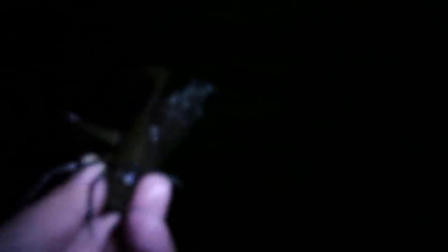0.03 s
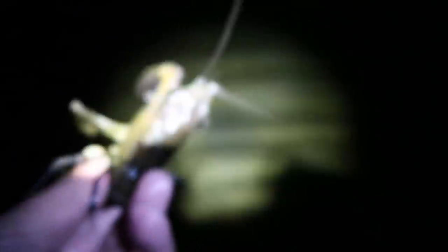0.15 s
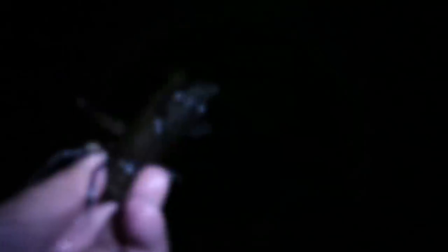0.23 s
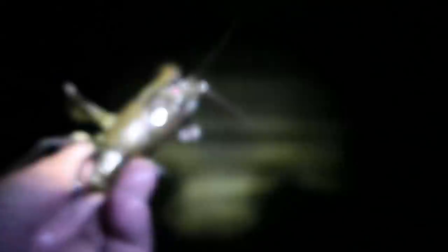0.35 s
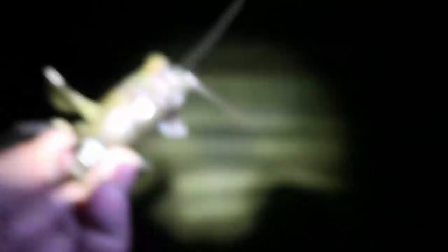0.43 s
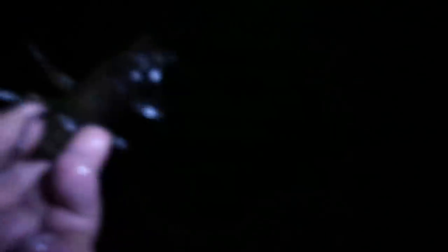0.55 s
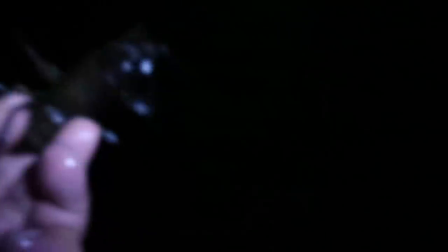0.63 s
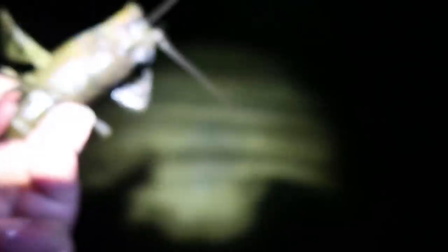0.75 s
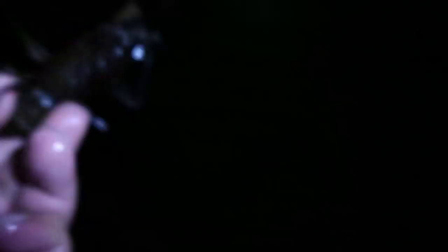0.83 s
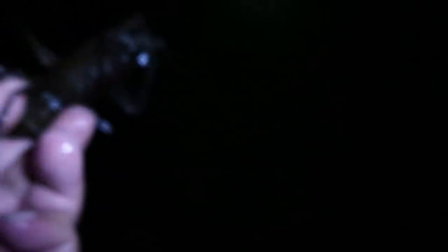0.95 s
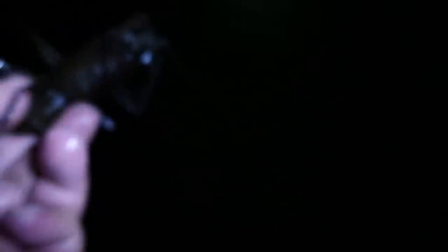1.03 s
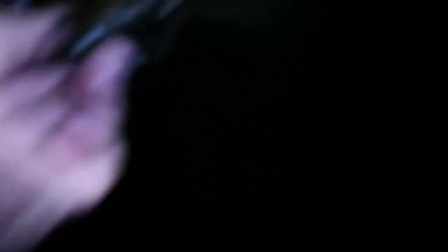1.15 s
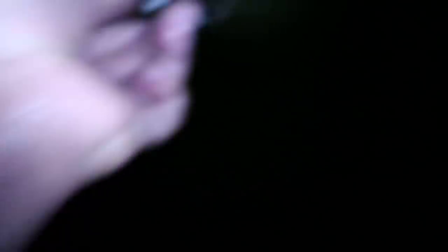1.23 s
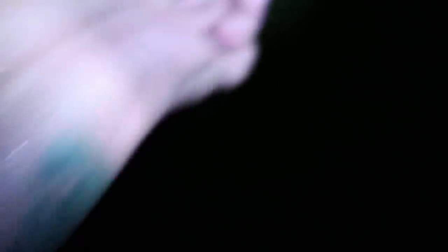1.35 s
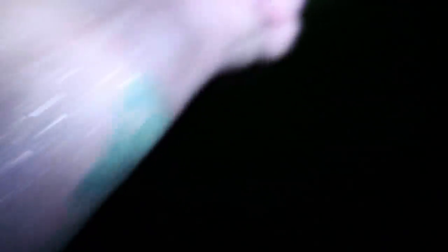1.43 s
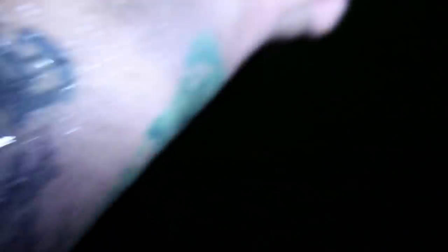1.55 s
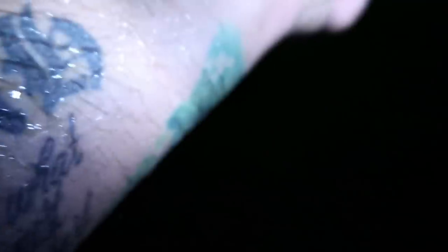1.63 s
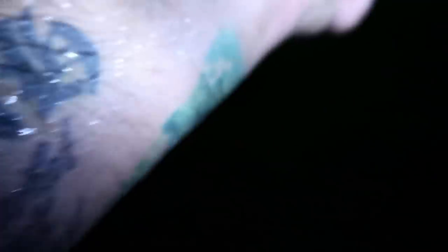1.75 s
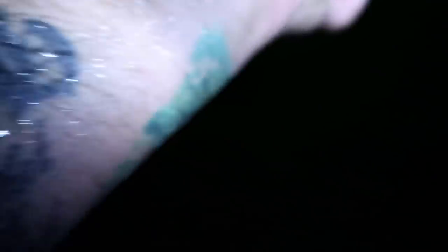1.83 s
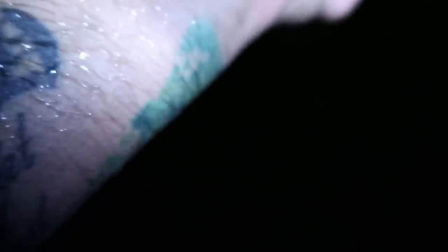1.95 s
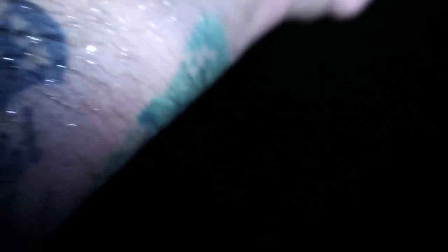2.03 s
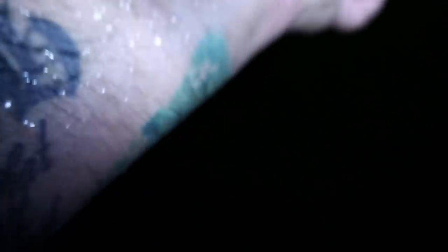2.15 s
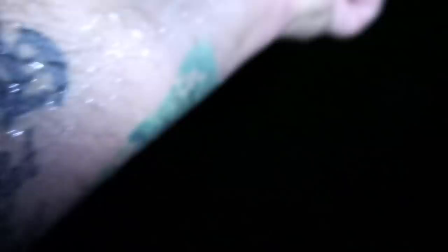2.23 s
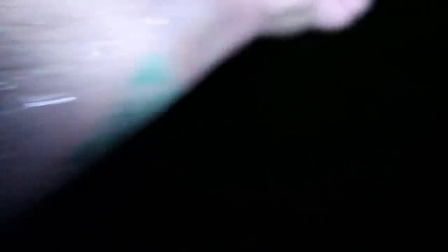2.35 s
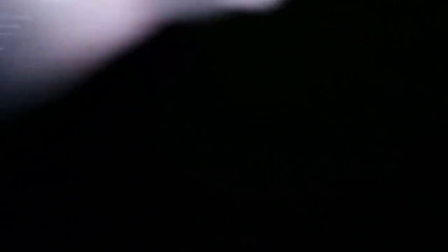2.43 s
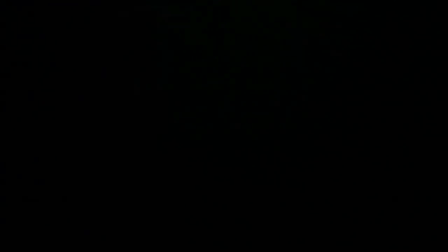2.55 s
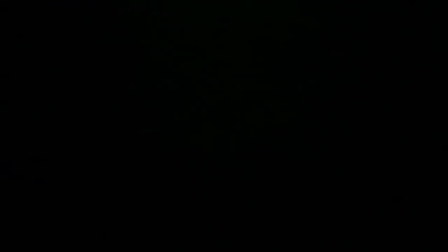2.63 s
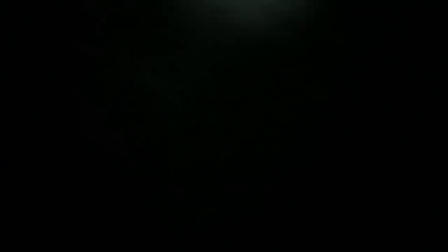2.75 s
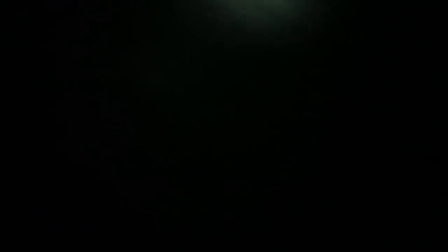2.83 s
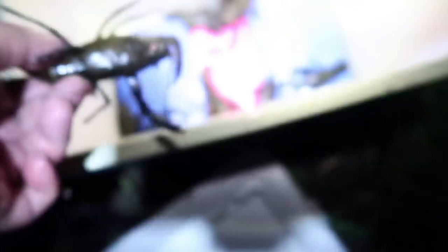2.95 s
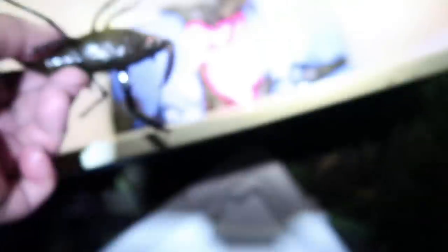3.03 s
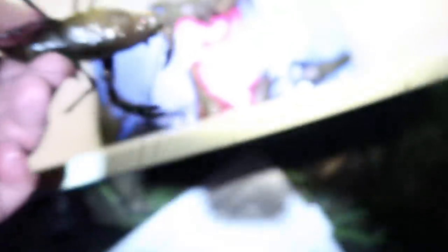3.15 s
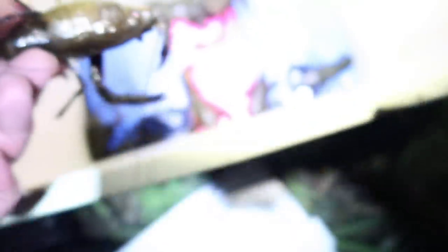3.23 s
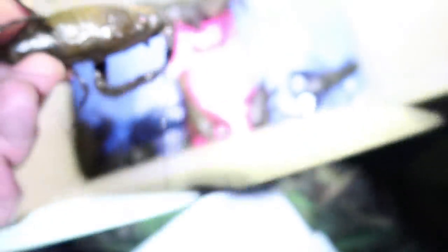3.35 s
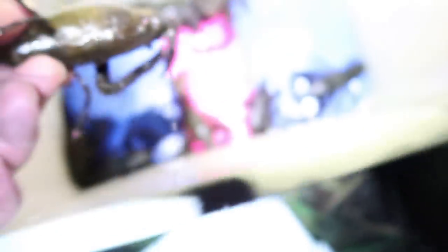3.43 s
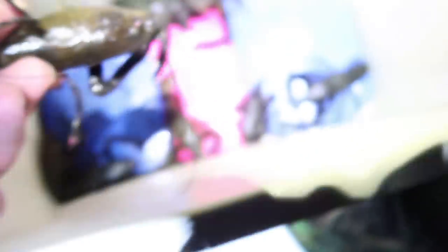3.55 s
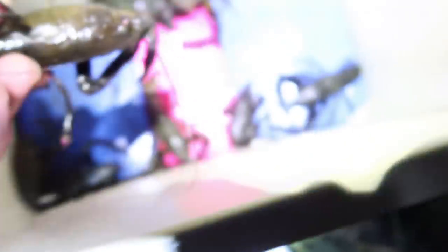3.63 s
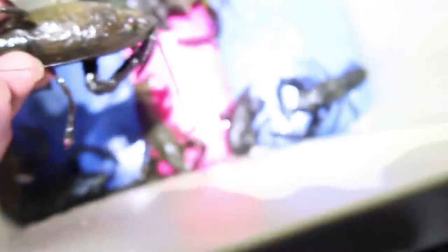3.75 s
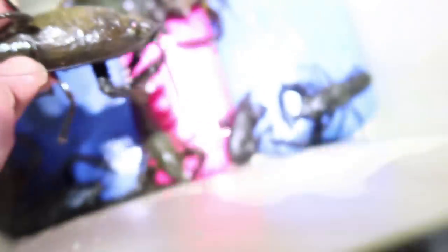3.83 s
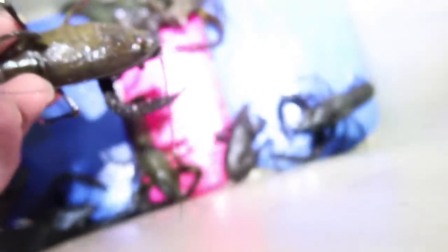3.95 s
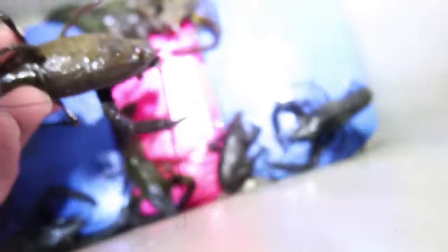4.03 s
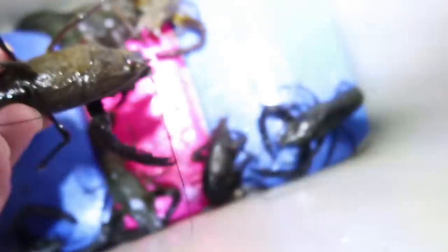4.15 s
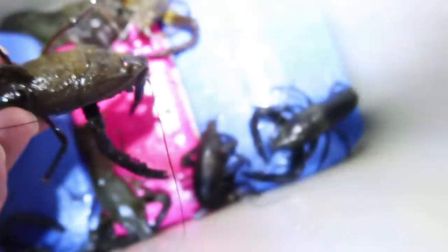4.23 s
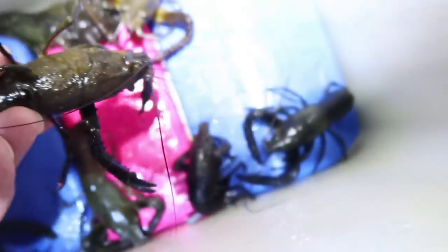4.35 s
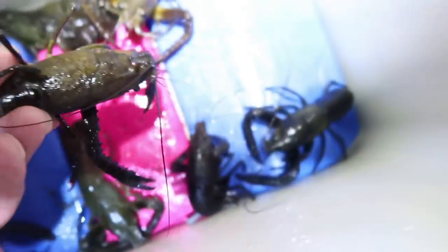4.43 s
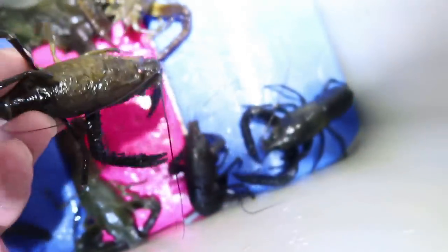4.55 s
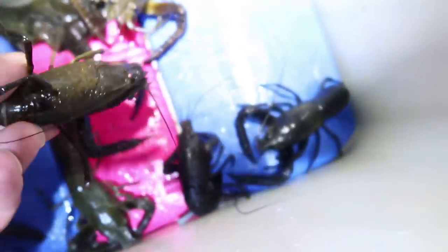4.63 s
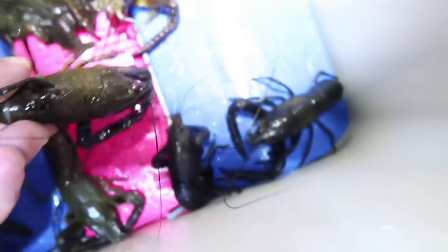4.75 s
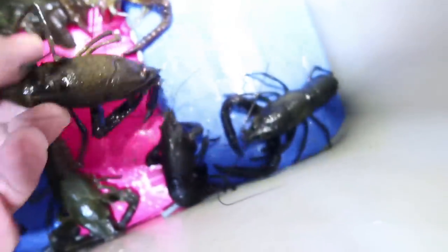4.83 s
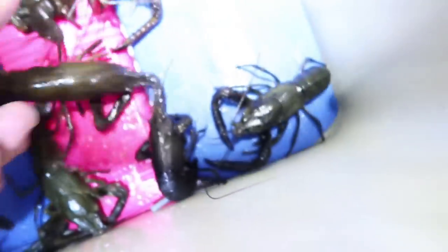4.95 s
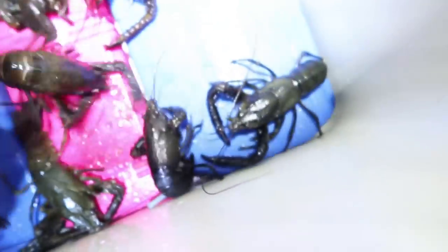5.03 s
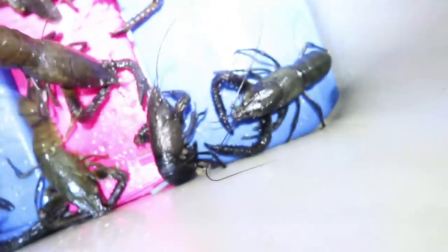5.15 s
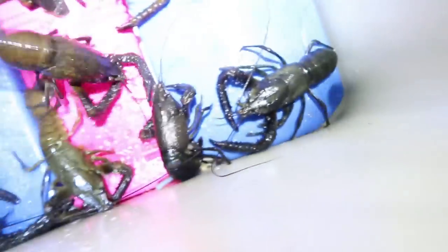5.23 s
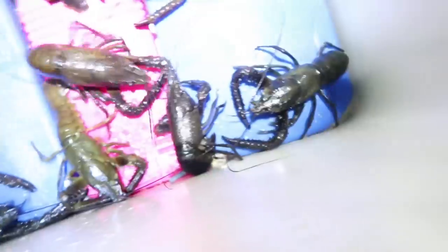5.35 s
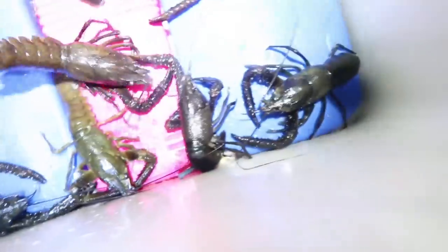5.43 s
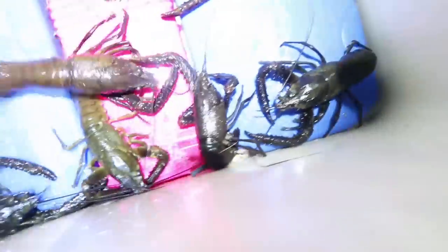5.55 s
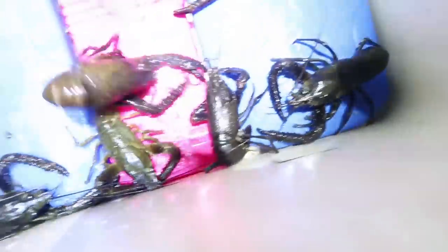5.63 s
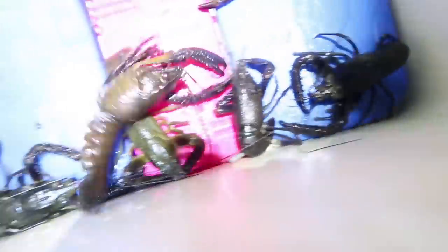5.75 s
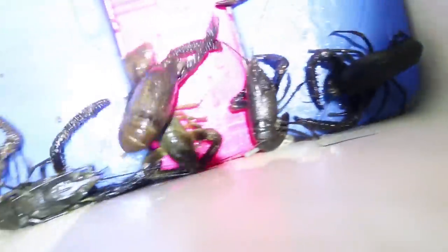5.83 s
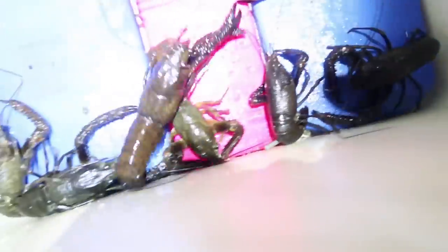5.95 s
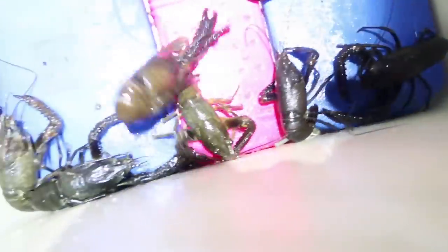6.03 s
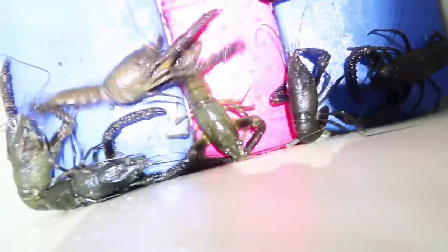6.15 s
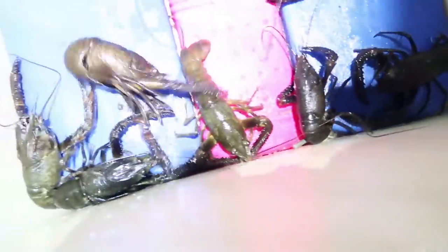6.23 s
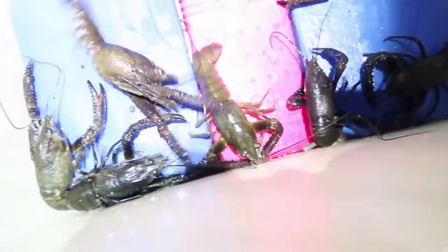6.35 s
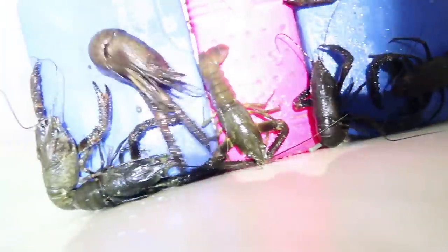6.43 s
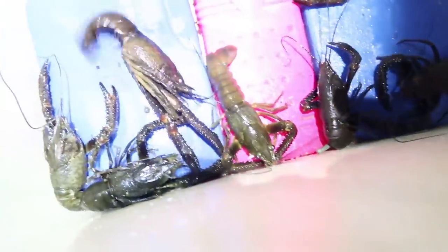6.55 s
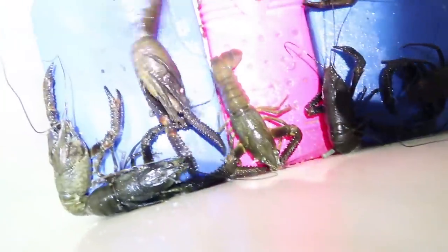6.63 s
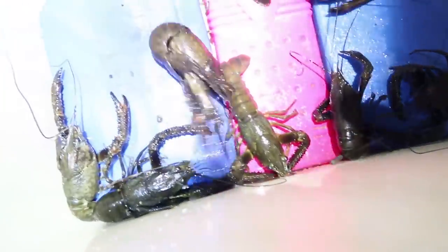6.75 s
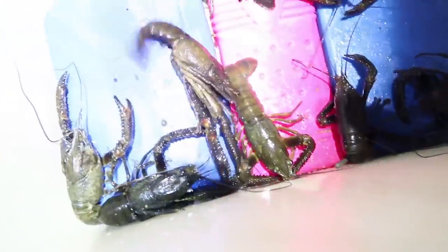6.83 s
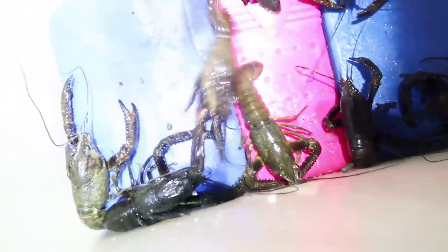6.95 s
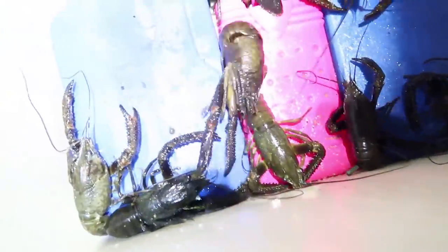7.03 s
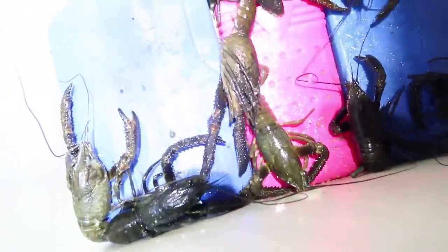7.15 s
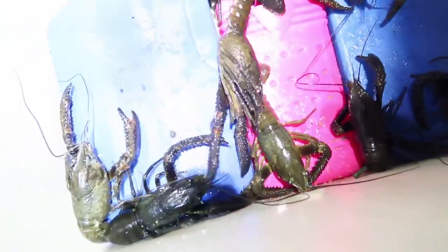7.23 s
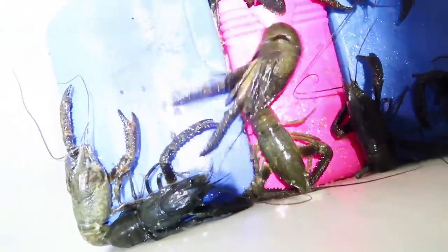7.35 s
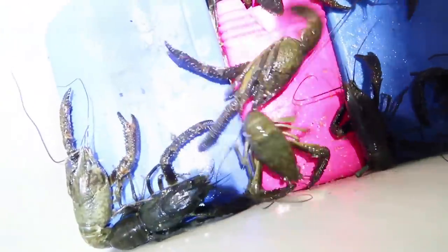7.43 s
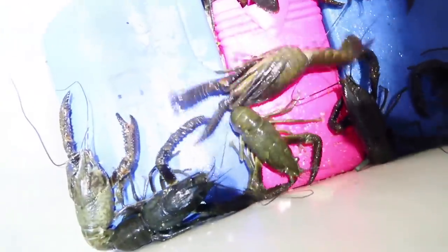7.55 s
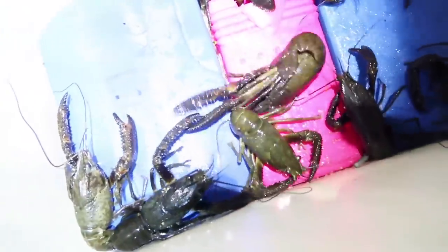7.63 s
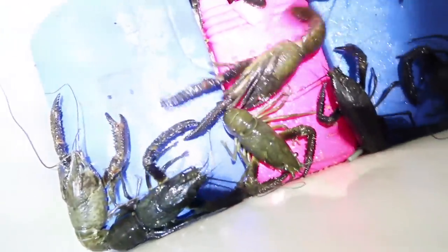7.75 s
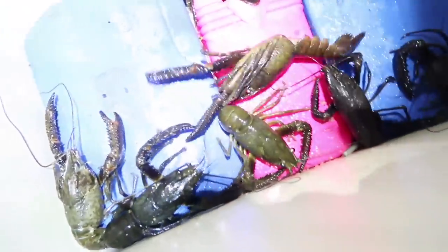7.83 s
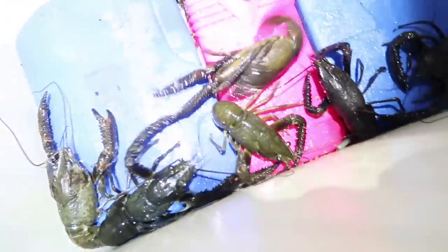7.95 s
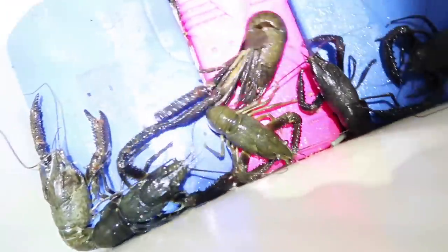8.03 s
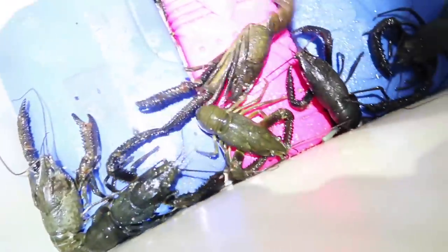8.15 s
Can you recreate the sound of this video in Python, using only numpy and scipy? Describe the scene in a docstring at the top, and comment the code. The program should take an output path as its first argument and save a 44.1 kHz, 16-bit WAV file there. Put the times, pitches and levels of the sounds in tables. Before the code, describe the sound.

Water trickles and bubbles close by in quiet, then crayfish shells knock and claws scrape in sharp bursts against a thin, hollow plastic box.

```python
"""A crayfish joins others in a plastic box: shells knock on its thin walls, legs and claws scratch in
strokes, feet patter. Knocks are noise bursts with a ringing mode; scratches are catch-and-slip crackle
with a gliding resonance; both ring the box modes. Shell ticks, short tones, a rub and a wavering hum join.
Trickling water (shaped noise, swelling sine bubbles) is near at first; its rush then recedes."""
import sys
import numpy as np
from scipy import signal
from scipy.fft import rfft, irfft, next_fast_len
from scipy.io import wavfile
from scipy.ndimage import uniform_filter1d

SR = 44100
rng = np.random.default_rng(int(sys.argv[2]) if len(sys.argv) > 2 else 0)


def bounce(signal):
    """Save signal as a 16-bit WAV file at the path given by the first command-line argument."""
    frames = np.transpose(np.atleast_2d(signal))
    limited = np.clip(frames, -1, 1)
    pcm = np.round(limited * 32767).astype(np.int16)
    wavfile.write(sys.argv[1], SR, pcm)


N = 361179
TIME = np.arange(N) / SR

# shell and claw blows on the box: t/s, relative level/dB, thud re level/dB, tick re level/dB, spot ring f/Hz
KNOCKS = [(2.763, -10, -22, -15, 2580), (2.954, -36, 15, -26, 480), (3.004, -17.5, -9, -32, 940),
          (3.014, -18.5, -5, -25, 1000), (3.025, -26, 9, -31, 476), (3.057, -18, 2.5, -27, 760),
          (3.152, -23.5, 5, -22, 690), (3.162, -27, 9.5, -31, 290), (3.488, -19, 3, -21, 719),
          (3.603, -21.5, -13, -19, 770), (3.628, -13, -19, -32, 814), (3.736, -22, -12, -11, 643),
          (4.062, -34, -15, 10.5, 1370), (4.234, -33, 0, -19, 920), (4.286, -34, 1, -27, 980),
          (4.449, -27, -2, -15, 1330), (4.515, -20, -4, -26, 854), (4.585, -23, 1, -28, 900),
          (4.605, -16, -14, -23, 820), (4.67, -23.5, -19, -9, 330), (4.742, -27, -23, -9, 2890),
          (4.857, -25, 13.5, -18, 696), (4.933, -26.5, -3, 6, 700), (4.955, -8, -11, -32, 790),
          (4.986, -0.5, -16, -26, 1115), (4.991, -1, -16, -29, 756), (5.006, 6.5, -17, -23, 860),
          (5.02, -3, -2, -13, 510), (5.042, -14.5, -10, 2.5, 930), (5.054, -8, 2, -16, 166),
          (5.075, 2, -5.5, -19.5, 1990), (5.105, -10.5, -4, -8.5, 210), (5.131, -14, -3, -15, 840),
          (5.163, -22.5, 5, -20, 687), (5.33, -18.5, -8, 6.5, 2970), (5.345, -8.5, 4.5, -33, 750),
          (5.366, -20.5, 7, 7, 363), (5.403, -5, -7.5, -11.5, 253), (5.441, -17.5, -8, -15, 890),
          (5.645, -5.5, 5.5, -10.5, 463), (5.673, -9, -3, -8, 1010), (5.692, -10, -12, -2, 517),
          (5.748, -14, -7.5, -24, 965), (5.877, 4.5, -20, -19, 1790), (5.884, -0.5, -26, -20, 3000),
          (5.953, -13, -14, -43, 1124), (6.088, -0.5, -7.5, -25.5, 840), (6.135, -9.5, -16, -23, 1990),
          (6.153, -19, 9.5, -29, 305), (6.189, -16.5, 6.5, -7, 224), (6.232, 0.5, -23, -43, 1680),
          (6.253, -16.5, 14, -28, 438), (6.289, -10, -5.5, -7.5, 250), (6.318, -7, -4, -13, 1840),
          (6.41, -22, 10.5, -6, 553), (6.488, -15.5, 2.5, -6, 220), (6.495, -14.5, 9.5, -17, 604),
          (6.531, -24, 7, -7, 298), (6.6, -24, 10, -37, 1220), (6.68, -16.5, 9, -23, 448),
          (6.713, -19, 7, -14, 498), (6.761, -17, 6, 0.5, 350), (6.79, -9, 10, -8, 587),
          (6.801, -5.5, 2, -9, 325), (6.845, -25, 9, 1, 275), (7.011, -8, -13, -9, 1243),
          (7.031, -4, -18, -16, 1295), (7.051, -4.5, -6.5, -6, 249), (7.114, -15.5, -4, -15, 1210),
          (7.126, -10.5, -18, 0, 1840), (7.212, -24, 0, 5.5, 200), (7.24, -5, -9, -41, 1070),
          (7.362, -3.5, -2, -35, 577), (7.373, -7.5, 4, -27, 680), (7.395, -7.5, 4, -8, 523),
          (7.424, -2.5, -15, -37, 1413), (7.481, -19.5, 16.5, -19, 500), (7.534, -11, 2, -21, 312),
          (7.576, -5.5, -5.5, -7.5, 745), (7.604, -14, 3.5, -22, 191), (7.622, -4, -13, -35, 1130),
          (7.669, -7, 0, -8, 718), (7.693, -1, -1, -36, 538), (7.727, -9.5, -4.5, -24, 1665),
          (7.873, -15.5, -2.5, -26, 458), (7.989, -11, 5, -41, 577), (8.005, -10.5, -1.5, -31, 535),
          (8.02, -3.5, -16, -14, 1614), (8.094, -7.5, -6.5, -21, 1063), (8.171, -20, 15.5, -30, 480)]
# strokes of legs and tails: peak t/s, rise/s, fall/s, relative force/dB, thud and tick re force/dB (before
# offsets), rasp f/Hz
STROKES = [(3.02, 0.022, 0.028, -29, 2.5, -33, 1100), (3.175, .02, 0.043, -33, 5.5, -17, 800),
           (4.322, 0.05, 0.022, -38, 8, -11.5, 1000), (4.53, 0.059, 0.048, -41.5, 8, -18, 825),
           (4.88, 0.031, 0.095, -37.5, 7.5, -12.5, 766), (5.012, 0.029, 0.1, -17, 0.5, -11, 1610),
           (5.207, 0.043, 0.058, -21, -10, -18.5, 2000), (5.333, 0.0068, 0.01, -26.5, 0, 0, 2960),
           (5.385, 0.067, 0.077, -30, 3.5, -2.5, 1390), (5.507, 0.015, 0.02, -32, 2, -29.5, 1400),
           (5.684, 0.023, 0.022, -16, -0.5, -8, 1930), (5.754, 0.028, 0.025, -24.5, -4, -21, 1800),
           (5.884, 0.026, 0.036, -17.5, 0, -9, 1680), (5.985, 0.027, 0.038, -28.5, -16, -21, 1520),
           (6.12, 0.067, 0.073, -18.5, -11, -18.5, 910), (6.258, 0.058, 0.09, -18, -3.5, -18.5, 2370),
           (6.482, 0.029, 0.029, -21.5, 6.5, -2, 775), (6.56, 0.073, .051, -38, 13, -22, 1360),
           (6.793, 0.068, 0.017, -20, 12.5, -12.5, 553), (6.953, 0.014, 0.019, -21, -4.5, -4.5, 1410),
           (7.041, 0.043, 0.046, -17, -2.5, -12, 1310), (7.235, 0.013, .012, -24.5, -2.5, -24, 1090),
           (7.385, 0.04, 0.03, -9, -7, -17.5, 1840), (7.474, 0.054, 0.073, -20, -1.5, -10, 1320),
           (7.652, 0.063, 0.073, -11.5, -11, -20, 1660), (7.801, 0.059, 0.16, -25.5, -6, -33, 1350),
           (7.88, 0.023, 0.02, -23, 2, -7.5, 1800), (8.023, 0.053, 0.066, -16.5, -4.5, -12, 1640),
           (8.17, 0.049, 0.034, -28.5, 8, -14.5, 765)]
# spectrum of struck plastic: f/Hz, level/dB
WALL_SPECTRUM = [(40, -36), (90, -51), (125, -20), (190, -13), (350, -6.5), (530, -3.5), (1000, -7),
                 (1700, -6), (2300, -11.5), (3100, -14), (4500, -20), (8000, -29.5), (12000, -29.5),
                 (15500, -53)]
# box resonances: f/Hz, width/Hz, relative lift/dB
BOX_MODES = [(193.2, 6.3, 7.5), (249, 12.4, 4.5), (306, 6.8, -2), (520.2, 12, -3.5), (7000, 840, -6)]
# stereo width of near sounds: f/Hz, side re mid/dB
WIDTH_NEAR = [(60, -16), (200, -57), (600, -26.5), (1300, -17.5), (2400, -11), (4400, -8), (8100, -1),
              (15000, 8.5)]


def amp(db):
    """Decibels to gain."""
    return 10 ** (np.asarray(db) / 20)


def unit(x):
    """Scales a mid-side pair to a mid rms of 1."""
    return x / np.sqrt(np.mean(x[0] ** 2) + 1e-20)


def read(points, hz):
    """Interpolates a spectrum in dB on a log-frequency axis."""
    f, db = np.transpose(points)
    return np.interp(np.log(hz + 1), np.log(f + 1), db)


def level(curve):
    """Gain of a level curve, falling 200 dB/s beyond its ends."""
    s, db = np.transpose(curve)
    outside_s = abs(TIME - np.clip(TIME, s[0], s[-1]))
    return amp(np.interp(TIME, s, db) - 200 * outside_s)


def add(mix, s, sound):
    """Mixes a sound in at time s."""
    part = mix[:, max(round(s * SR), 0):][:, :sound.shape[1]]
    part += sound[:, :part.shape[1]]


def noise(colour, width, size):
    """Mid-side noise of a given colour and stereo width, from random phases."""
    hz = np.fft.rfftfreq(size, 1 / SR)
    z = np.exp(2j * np.pi * rng.random((2, len(hz)))) * amp(read(colour, hz))
    z[1] *= amp(read(width, hz))
    return unit(irfft(z, size))


def long_noise(colour, width):
    """Noise that lasts the whole scene."""
    return noise(colour, width, size=next_fast_len(N))[:, :N]


def random_clicks(per_s, spread_db):
    """Click mask at a mean rate, and capped random click gains."""
    return rng.random(N) < per_s / SR, amp(spread_db * np.minimum(rng.exponential(1, N), 4))


def resonate(x, hz, width_hz):
    """A resonance of gain 1 at its centre."""
    return signal.lfilter(*signal.iirpeak(hz, hz / width_hz, fs=SR), x)


def glide(x, hz, width_hz):
    """A resonance that follows a pitch curve: shift to 0 Hz, low-pass, shift back."""
    turn, r = np.exp(2j * np.pi * np.cumsum(hz) / SR), np.exp(-np.pi * width_hz / SR)
    return (turn * signal.lfilter([1 - r], [1, -r], x / turn)).real


def swell(t, peak_s, rise_s, fall_s, db, edge_db=-15, bend=1.38):
    """Gain of one gesture: rises to a peak and falls away, edge_db down where it starts and stops."""
    contact_s = 0.036  # time to meet or leave the surface
    away = np.clip(np.maximum((peak_s - t) / rise_s, (t - peak_s) / fall_s), 0, 2)
    inside_s = np.minimum(t - peak_s + rise_s, peak_s + fall_s - t)
    return amp(db + edge_db * away ** bend) * np.clip(inside_s / contact_s + .5, 0, 1)


def band_gains(hz):
    """Soft split into thud, clack and tick."""
    low, high = (1 / (1 + (hz / edge_hz) ** 6) for edge_hz in (720, 3470))
    return np.sqrt([low, (1 - low) * high, (1 - high) ** 2])


def spot(ring_hz, ring_db, t60s, tail_db, tail_t60, lumps_db=6.0, ring_t60=0.046,
         rise_s=(.0006, .0006, .0025), size=4096):
    """Thud, clack and tick of one wall spot: unevenly coloured decay, slower echo tail, ringing mode."""
    t, hz = np.arange(size) / SR, np.fft.rfftfreq(size, 1 / SR)
    lumps = np.transpose([np.geomspace(150, 16000, 40), lumps_db * rng.standard_normal(40)])
    colour = rfft(noise(WALL_SPECTRUM, WIDTH_NEAR, size)) * amp(read(lumps, hz))
    rings = irfft(colour * band_gains(hz)[:, None], size)
    decay = amp(-60 * t / np.array(t60s)[:, None])
    tail = amp(tail_db - 60 * t / tail_t60)
    rings *= (decay + tail)[:, None]
    rings /= np.linalg.norm(rings[:, :1], axis=2, keepdims=True)
    # ring_t60/s holds at 1 kHz; low rings last longer
    mode = np.sin(2 * np.pi * ring_hz * t) * amp(-60 * t / ring_t60 * (ring_hz / 1000) ** 0.3)
    rings[np.argmax(band_gains(ring_hz)), 0] += amp(ring_db) * mode / np.linalg.norm(mode)
    rings *= 1 - np.exp(-t / np.array(rise_s)[:, None, None])  # each band's attack has its own short rise
    return rings / np.linalg.norm(rings[:, :1], axis=2, keepdims=True)


def knocks(db=2, thud_db=0, tick_db=0, ring_db=2, ring_db_per_octave=-2.5, t60s=(.03, .016, .012),
           echo_db=-13):
    """Each blow rings its own spot of wall; spots of higher pitch are stiffer and ring less."""
    supple_hz = 520  # spot pitch at which ring_db applies
    out = np.zeros((2, N))
    for s, blow_db, thud, tick, hz in KNOCKS:
        stiffness = np.log2(hz / supple_hz)
        gains = amp(db + blow_db + np.array([thud + thud_db, 0, tick + tick_db]))
        rings = spot(hz, ring_db + ring_db_per_octave * stiffness, t60s, echo_db, tail_t60=0.075)
        add(out, s, np.tensordot(gains, rings, 1))
    return out * np.sqrt(0.00078 * SR)  # unit energy to unit rms over 0.78 ms


def grips():
    """A claw catches at uneven intervals: number of the current catch and seconds since it."""
    grips_per_s = 85
    starts = np.append(0, np.cumsum(rng.gamma(2, .5, N)) / grips_per_s)
    catch = np.searchsorted(starts, TIME, "right") - 1
    return catch, TIME - starts[catch]


def slips(per_s, spread_db, even_s, ring_db, roam_s, colour_db=4.0, detune=0.36, stay=0.42):
    """Claw tips catch and slip, each slip on a spot of wall: three bands of crackle, each of rms 1."""
    let_go_s, drag = 0.004, 0.55  # snap decay; steady drag re the snap's initial force
    catch, age = grips()
    hits, gains = random_clicks(per_s, spread_db)
    clicks = (hits | (age < 1 / SR)) * gains
    # click strength is evened out over even_s
    clicks /= np.sqrt(abs(uniform_filter1d(clicks ** 2, max(int(even_s * SR), 2))) + 0.0019)
    clicks *= rng.choice([-1, 1], N) * (drag + np.exp(-age / let_go_s))
    near_s = TIME + roam_s * rng.standard_normal(N)
    last_knock = np.maximum(np.searchsorted(np.array(KNOCKS)[:, 0], near_s) - 1, 0)
    # a share "stay" takes the pitch of a knock close in time, the rest a spot that changes with every catch
    count = len(KNOCKS)
    where = np.where(rng.random(N) < stay, last_knock, count + catch % count)
    other_hz = 1450 * np.exp(2 * detune * rng.uniform(-1, 1, count))
    rings_hz = [row[4] for row in KNOCKS] + list(other_hz)
    spots = [spot(hz, ring_db, (.035, .022, .012), -13, .07) for hz in rings_hz]
    out = np.zeros((3, 2, N + SR))
    at = np.flatnonzero(clicks)
    for i, colour in zip(at, amp(colour_db * rng.standard_normal((len(at), 3, 1, 1)))):
        out[:, :, i:i + spots[0].shape[2]] += clicks[i] * colour * spots[where[i]]
    return np.array([unit(band[:, :N]) for band in out])


def scratches(db=-1, thud_db=0, tick_db=1, thud_growth_db=9, tick_growth_db=-1):
    """Strokes of legs and tails: slips under a swelling force, with a rasp that hops and drifts in pitch."""
    rasp_db, rasp_width = -7.5, 0.085  # level re force; bandwidth as a share of the stroke's rasp pitch
    rasp_glide, rasp_hop = 0.15, 0.12  # log-pitch spread: drift per stroke length, jump per catch
    margin_s = 0.036  # lets the gesture fade fully
    crackle = slips(per_s=700, spread_db=2.5, even_s=0.009, ring_db=0.0, roam_s=.02)
    out = np.zeros((2, N))
    hop = rng.standard_normal(N)[grips()[0]]
    for stroke, drift in zip(STROKES, rng.standard_normal(len(STROKES))):
        peak_s, rise_s, fall_s, force_db, thud, tick, hz = stroke
        at = np.flatnonzero((TIME > peak_s - rise_s - margin_s) & (TIME < peak_s + fall_s + margin_s))
        t, gesture = TIME[at], (peak_s, rise_s, fall_s, db + force_db)
        progress = (t - peak_s) / (rise_s + fall_s)
        force = swell(t, *gesture, edge_db=-10.5)
        tick_force = swell(t, *gesture, edge_db=-10.0)
        gains = np.array([force * amp(thud + thud_db + thud_growth_db * progress), force,
                          tick_force * amp(tick + tick_db + tick_growth_db * progress)])
        pitch_hz = hz * np.exp(rasp_glide * drift * progress + rasp_hop * hop[at])
        rasp = unit(glide(crackle[:, :, at].sum(0), pitch_hz, rasp_width * hz))
        out[:, at] += (crackle[:, :, at] * gains[:, None]).sum(0) + amp(rasp_db) * force * rasp
    return out


def tread(thud_db=-2, clack_db=-5, tick_db=-18):
    """Many small feet patter on the plastic, harder just after each stroke's peak."""
    # patter: t/s, relative level/dB
    restless = [(4.1, -76), (4.9, -44.5), (6.4, -35.5), (8.19, -38.5)]
    stir, settle_s = 0.32, 0.19  # each stroke stirs the others, and they settle again
    patter = slips(per_s=140, spread_db=4.5, even_s=.05, ring_db=1, roam_s=.4)
    stirred = sum((TIME > s) * np.exp(-abs(TIME - s) / settle_s) for s, *_ in STROKES)
    bands = np.tensordot(amp([thud_db, clack_db, tick_db]), patter, 1)
    return bands * level(restless) * (1 + stir * stirred)


def box(x, dry_db=-7, ring_db=-4):
    """The hollow box rings on at its own resonances; being small, it radiates little below 74 Hz."""
    x = signal.sosfilt(signal.butter(2, 74, "highpass", fs=SR, output="sos"), x)
    return amp(dry_db) * x + sum(amp(db + ring_db) * resonate(x, hz, width) for hz, width, db in BOX_MODES)


def shell_ticks(db=0):
    """Faint dry ticks from the shell joints of the held crayfish: tick band of a short, stiff spot."""
    # joint ticks: t/s, level/dB (root energy)
    joint_ticks = [(1.3, -20.5), (1.359, -22.5), (1.444, -20), (2.349, -21), (3.84, -24.5), (3.96, -24.5),
                   (4.47, -20.5)]
    out = np.zeros((2, N))
    for s, tick_db in joint_ticks:
        add(out, s, amp(db + tick_db) * spot(3700, -27, (.02, .015, .005), -30, .05)[2])
    return out


def short_tones(db=0, jitter=0.074, rough=0.36):
    """Short squeaks, a thin high rattle and a low ringing tone: gliding sines, unsteady in pitch and level."""
    # tones: start t/s, end t/s, level/dB, first f/Hz, last f/Hz
    tone_rows = [(2.719, 2.763, -32.5, 812, 767), (2.736, 2.855, -48, 3100, 2260),
                 (2.873, 2.896, -47, 4250, 4400), (3.004, 3.035, -54, 5050, 4900),
                 (4.669, 4.711, -36, 285, 311)]
    out = np.zeros((2, N))
    for start_s, end_s, tone_db, first_hz, last_hz in tone_rows:
        size = max(int((end_s - start_s) * SR), 100)
        wobble, flutter = uniform_filter1d(rng.standard_normal((2, size)), size=64) * np.sqrt(64)
        pitch_hz = np.linspace(first_hz, last_hz, size) * (1 + jitter * wobble)
        tone = (1 + rough * flutter) * np.sin(2 * np.pi * np.cumsum(pitch_hz) / SR)
        tone = amp(db + tone_db) * np.sqrt(2) * tone * signal.windows.tukey(size, .2)
        add(out, start_s, np.outer([1, .2], tone))
    return out


def rub(db=2, per_s=500, spread_db=3, smooth_db=-1, uneven_db=1.0):
    """A hollow, continuous rasp on the outside of the box: fine grains under uneven pressure."""
    # rubbing: t/s, relative level/dB
    rub_curve = [(3.27, -48), (3.5, -32.5), (3.65, -31.5), (3.71, -39.5), (3.94, -41), (3.995, -48)]
    # rub spectrum: f/Hz, level/dB
    rub_spectrum = [(130, -37), (235, -7.5), (310, -12.5), (540, -4.5), (700, 0), (870, 0), (1130, -17.5),
                    (1450, -12.5), (1650, -23), (3000, -31.5), (7000, -48)]
    hits, gains = random_clicks(per_s, spread_db)
    grains = hits * gains * rng.choice([-1, 1], N)
    size = next_fast_len(N)
    colour = amp(read(rub_spectrum, np.fft.rfftfreq(size, 1 / SR)))
    rough = unit(np.outer([1, 0], irfft(rfft(grains, size) * colour, size)[:N]))
    smooth = long_noise(rub_spectrum, WIDTH_NEAR)
    pressure = long_noise([(5, 0), (25, 0), (100, -80)], WIDTH_NEAR)[0]
    return amp(db + uneven_db * pressure) * level(rub_curve) * unit(rough + amp(smooth_db) * smooth)


def hollow(hum_db=-3, murmur_db=-2, waver_hz=1.52, count=4):
    """In the mouth of the box a low hum wavers, and the air murmurs at the first resonances."""
    # hum: t/s, relative level/dB
    hum_curve = [(6.15, -56), (6.22, -40), (6.58, -42), (6.7, -53), (6.82, -34), (6.93, -60), (7.07, -35),
                 (7.22, -32.5), (7.35, -44), (7.43, -35), (7.8, -43.5), (8.19, -59)]
    # murmur of air: t/s, relative level/dB
    murmur_curve = [(4.0, -59), (5.8, -38), (8.19, -39)]
    hum_hz = 131.5  # mean pitch
    waver = long_noise([(1, 0), (4, 0), (20, -60), (100, -120)], WIDTH_NEAR)[0]
    hum = np.sqrt(2) * np.sin(2 * np.pi * np.cumsum(hum_hz + waver_hz * waver) / SR)
    air = long_noise(WALL_SPECTRUM, WIDTH_NEAR)
    murmur = unit(sum(amp(db) * resonate(air, hz, width) for hz, width, db in BOX_MODES[:count]))
    hum_part = amp(hum_db) * np.outer([1, 0], hum) * level(hum_curve)
    return hum_part + amp(murmur_db) * murmur * level(murmur_curve)


def bubble(db, hz, climb):
    """A bubble swells, rings and glides in pitch (climb/octaves per s); small ones die sooner."""
    swell_s_1khz, damping = 0.0048, 1.49  # swell time at 1 kHz; power of pitch that shortens it
    t = np.arange(SR // 14) / SR
    swell_s = swell_s_1khz * (hz / 1000) ** -damping
    pitch_hz = hz * 2 ** (climb * (t - swell_s))
    ring = np.sin(2 * np.pi * np.cumsum(pitch_hz) / SR) * t / swell_s * np.exp(1 - t / swell_s)
    return amp(db) * ring * np.array([[1], [rng.uniform(-0.06, 0.17)]])


def water(rush_db=5, swish_db=-2, wash_db=-50, bubble_db=0, small_db=-15.0, count=140):
    """Running water: noise rush, surging low wash, clear bubbles close by and many small ones."""
    # rush spectrum: f/Hz, level/dB
    rush_spectrum = [(15, -29), (25, -6.5), (131, 10), (158, -0.5), (257, 4), (394, -4), (488, -8.5),
                     (769, -3), (978, -2), (2000, -2), (2300, -4), (5720, -15.5), (11000, -34.5),
                     (15000, -92)]
    # rush: t/s, relative level/dB
    rush_curve = [(0.0, -51.5), (2.89, -49.5), (3.14, -53.5), (4.16, -57), (4.8, -55.5)]
    # surges of low wash: peak t/s, rise/s, fall/s, relative level/dB
    surge_rows = [(.02, 0.11, 0.12, -48.5), (.6, 0.16, 0.22, -55), (1.62, 0.29, 0.33, -44)]
    # wash spectrum: f/Hz, level/dB
    wash_spectrum = [(100, -2.5), (230, 2.5), (400, 1), (540, 4.5), (700, -3), (1000, -19), (2500, -18),
                     (11000, -28.5), (14500, -49)]
    # stereo width of water: f/Hz, side re mid/dB
    width_far = [(60, -34), (110, -18.5), (200, -13), (380, -6), (700, -11), (1290, -9), (2380, -5.5),
                 (4400, -3), (8120, 3.5), (15000, 20)]
    # clear bubbles near the surface: t/s, peak level/dB, f/Hz, climb/octaves per s
    bubble_rows = [(0.01, -30, 1670, 20), (0.034, -31.5, 1120, 3), (0.178, -32, 1950, 70),
                   (0.224, -34.5, 948, -4), (0.264, -37, 1890, 60), (0.294, -32.5, 2210, 100),
                   (0.316, -36, 1640, 0), (0.329, -31, 2480, 0), (0.376, -36, 1530, 0),
                   (0.43, -37, 1090, -2), (0.464, -35, 1800, 105), (0.465, -36, 990, 3),
                   (0.487, -37, 1800, 65), (0.499, -32.5, 1660, 75), (0.598, -37.5, 1090, 47),
                   (0.619, -36, 1580, 70), (0.827, -32, 1123, 44), (0.902, -34, 1360, 11),
                   (0.93, -34, 1710, 70), (0.945, -35.5, 1400, 53), (1.039, -39.5, 1150, 15),
                   (1.086, -39, 1620, 55), (1.111, -27, 1800, 70), (1.155, -34, 1195, 18),
                   (1.173, -37, 1890, 58), (1.241, -38.5, 994, 3), (1.445, -32, 1565, -26),
                   (1.556, -32, 1780, 6), (2.542, -28.5, 1290, 22), (2.641, -31.5, 1780, 10)]
    nearness = amp(np.interp(TIME, *np.transpose(rush_curve)))
    out = amp(rush_db) * nearness * long_noise(rush_spectrum, width_far)
    surges = amp(wash_db) + sum(swell(TIME, *surge, edge_db=-21.0, bend=1.8) for surge in surge_rows)
    out += amp(swish_db) * surges * long_noise(wash_spectrum, width_far)
    for s, db, hz, climb in bubble_rows:
        add(out, s, bubble(db + bubble_db, hz, climb))
    for parent, delay, size, pitch in rng.random((count, 4)):  # small bubbles break off the large ones
        s, db, hz, climb = bubble_rows[int(parent * len(bubble_rows))]
        small = bubble(db + small_db + 10 * size, hz * 1.8 ** (pitch - .2), climb)
        add(out, s + 0.049 * delay ** 2, small)
    return out


def soft_bumps(db=-3):
    """Soft low bumps: swelling low-frequency noise."""
    # bumps: peak t/s, rise/s, fall/s, relative level/dB
    bump_rows = [(2.51, 0.043, 0.026, -39), (2.565, 0.021, 0.016, -31), (2.615, .03, 0.055, -34),
                 (2.73, 0.069, 0.08, -37)]
    bumps = sum(swell(TIME, *bump, edge_db=-6.5) for bump in bump_rows)
    return amp(db) * bumps * long_noise([(15, -12), (40, 6), (70, 3), (130, 0.5), (400, -49)], WIDTH_NEAR)


def scene():
    """All sources as mid and side, turned into left and right."""
    crayfish = box(knocks() + scratches() + tread()) + shell_ticks()
    mid, side = crayfish + short_tones() + rub() + hollow() + water() + soft_bumps()
    return np.array([mid + side, mid - side])


def record(dry):
    """Rounds peaks off near full scale, then low-passes at 15.7 kHz."""
    limited = dry / (1 + dry ** 6) ** (1 / 6)
    lowpass = signal.firwin(511, 15700, window=("kaiser", 9), fs=SR)
    return signal.oaconvolve(limited, lowpass[None], "same")


dry = scene()
out = record(dry)
bounce(out)
```